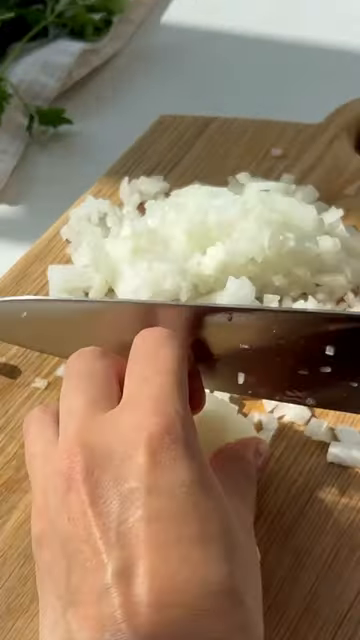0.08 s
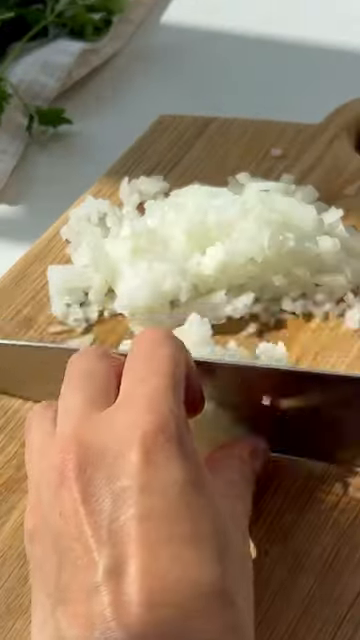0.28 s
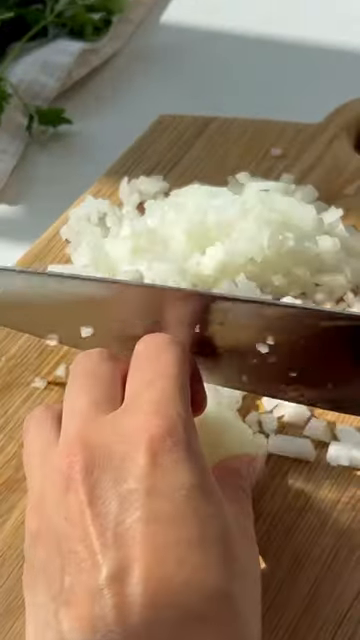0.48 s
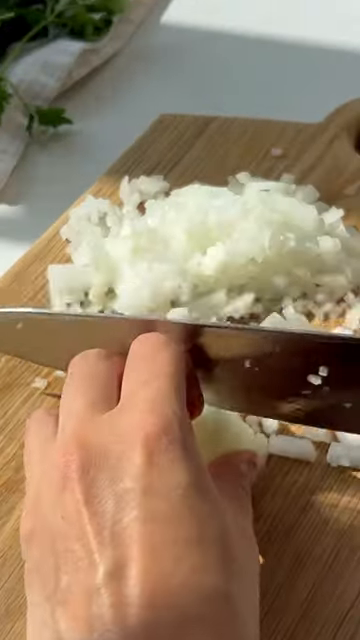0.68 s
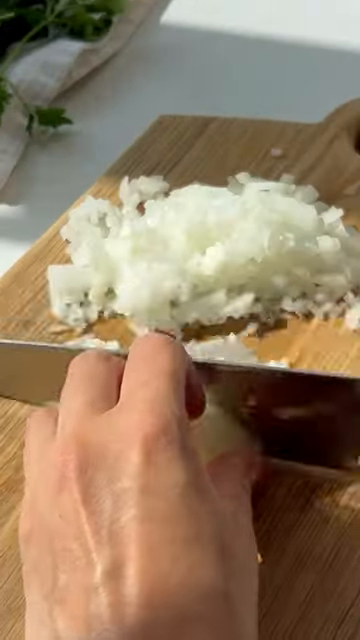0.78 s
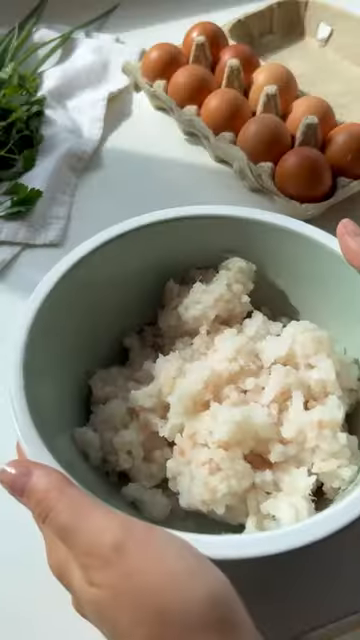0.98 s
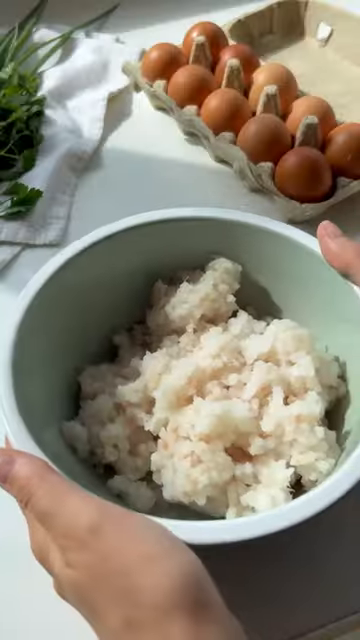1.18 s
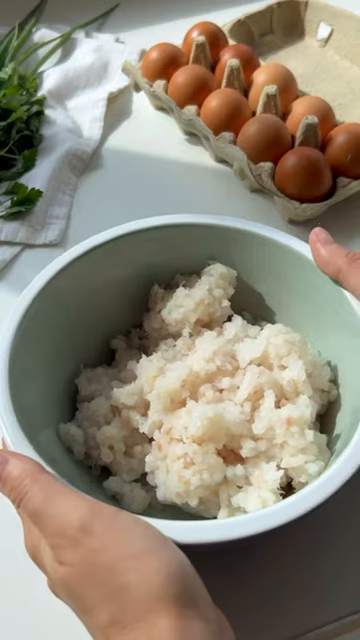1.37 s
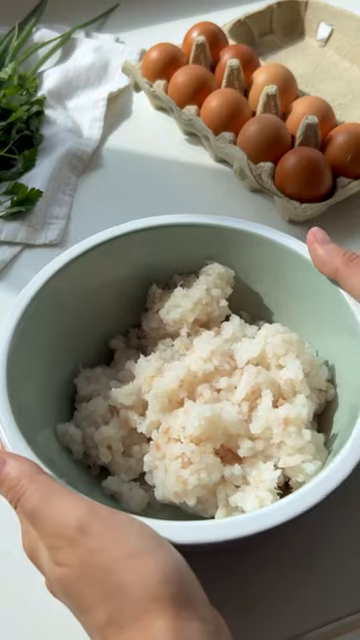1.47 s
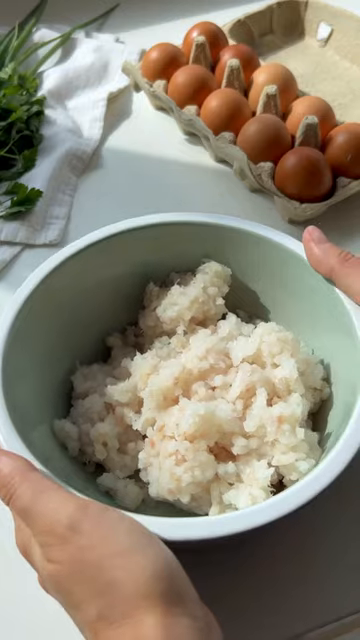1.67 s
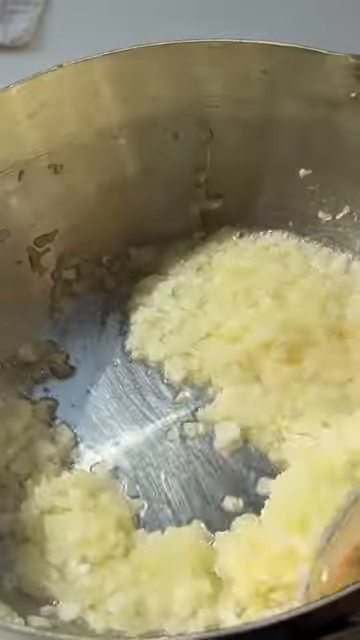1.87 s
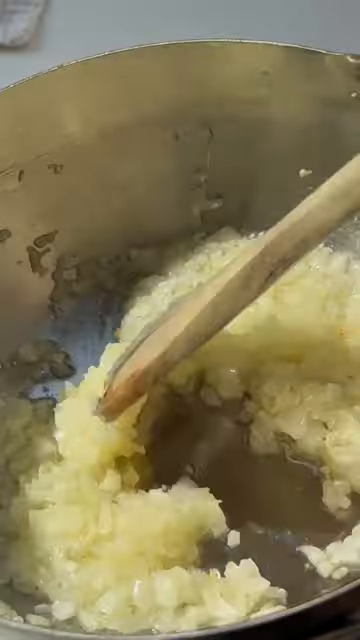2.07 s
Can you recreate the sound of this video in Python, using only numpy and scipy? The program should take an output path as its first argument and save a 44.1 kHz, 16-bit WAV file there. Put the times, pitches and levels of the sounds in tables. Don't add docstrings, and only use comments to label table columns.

```python
import sys
import numpy as np
from scipy import signal
from scipy.fft import rfft, irfft, next_fast_len
from scipy.io import wavfile

SR = 44100
rng = np.random.default_rng(int(sys.argv[2]) if len(sys.argv) > 2 else 0)


def ratio(d):
    e = np.asarray(d, float) / 20
    return 10 ** e


def master(y):
    cut = np.clip(np.atleast_2d(y).T, -1, 1)
    pcm = np.round(cut * 32767)
    wavfile.write(sys.argv[1], SR, pcm.astype(np.int16))


N = 94815
TIME = np.arange(N) / SR
SIZE = next_fast_len(2 * N)


def colour(x, points, causal=True):
    hz, db = np.array(points, float).T
    bin_hz = np.arange(SIZE // 2 + 1) * SR / SIZE
    gain_db = np.interp(np.log(bin_hz + 1), np.log(hz), db)
    cepstrum = irfft(gain_db * np.log(10) / 20, SIZE)
    if causal:
        cepstrum[1:SIZE // 2] *= 2
        cepstrum[SIZE // 2 + 1:] = 0
    return irfft(rfft(x, SIZE) * np.exp(rfft(cepstrum)), SIZE)[..., :N]


def level(x, db=0):
    return x * ratio(db) / np.sqrt(np.mean(x ** 2))


def ring(force, modes):
    t = TIME[:SR // 2]
    body = 0
    for k, (hz, db, t60) in enumerate(modes):
        decay = ratio(db - 60 * t / max(t60, .005))
        body = body + (-1) ** k * decay * np.sin(2 * np.pi * hz * t)
    return signal.fftconvolve(force, body / np.abs(body).max())[:N]


def blows(hits):
    force = np.zeros(N)
    for s, db, ms in hits:
        phase = np.clip((TIME - s) / (ms / 1000), 0, 1)
        force += ratio(db) * np.sin(np.pi * phase) ** 2 / (ms * SR / 2000)
    return force


def grains(rate, spread_db, channels=2):
    shape = (channels, N)
    struck = rng.random(shape) < rate / SR
    sizes = rng.standard_normal(shape)
    loudness = ratio(spread_db * np.minimum(rng.exponential(size=shape), 5))
    return level(struck * sizes * loudness)


def curve(points):
    s, db = np.array(points, float).T
    return ratio(np.interp(TIME, s, db))


# f/Hz, level/dB
ROOM_COLOUR = [(60, 0.5), (200, -1), (2000, -1), (2800, -1), (12000, -6)]


def room(x, wet_db):
    low_t60_s, halved_at_hz, first_wall_s = 0.79, 7100, 0.0054
    early_db, early_t60_s = 6, 0.11
    early = ratio(early_db - 60 * TIME / early_t60_s)
    tail = 0
    for hz in 62.5 * 2. ** np.arange(8):
        t60 = low_t60_s / (1 + hz / halved_at_hz)
        octave = signal.butter(2, [hz / 2 ** .5, hz * 2 ** .5], "band", fs=SR, output="sos")
        band = signal.sosfilt(octave, rng.standard_normal((2, N)))
        tail = tail + band * (ratio(-60 * TIME / t60) + early)
    tail = colour(tail * np.clip((TIME - first_wall_s) / 0.0018, 0, 1), ROOM_COLOUR)
    tail = tail / np.sqrt(np.sum(tail[0] ** 2))
    return ratio(wet_db) * signal.fftconvolve(x[None], tail, axes=1)[:, :N]


LEAN = [0, 0.31, 0.47, 0.25]


def placed(x, lean, wet_db):
    return np.array([x, lean * x]) + room(x, wet_db)


# f/Hz, level/dB
EARLY_FRYING = [(40, 5.5), (600, -18), (1200, -7), (2500, -15.5), (6000, -18.5), (8900, -9), (11400, -23),
                (12600, -73)]
# f/Hz, level/dB
FRYING = [(250, -41), (800, -4), (2100, -5), (10400, -3.5), (11900, -8.5), (12600, -61.5)]


def frying(spectrum, db, rate, spread_db):
    crackle = grains(rate, spread_db)
    hiss = 0.94 * rng.standard_normal((2, N))
    return level(colour(crackle + hiss, spectrum), db)


# f/Hz, level/dB
HUM = [(25, -16.5), (100, -3), (234, 1.5), (374, -17), (490, -12), (880, -28), (7600, -36.5), (12600, -59)]


def hum():
    return level(colour(rng.standard_normal((2, N)), HUM))


# t/s, length/s, level/dB, swell/dB
SLICES = [
    (0.089, .014, -61, 9),
    (0.1, 0.023, -47.5, 4),
    (.125, 0.056, -63, 17),
    (0.186, 0.082, -37.5, 10),
    (0.592, 0.0058, -45.5, -9.5),
    (0.604, 0.062, -69.5, -1.5),
    (0.66, 0.05, -47.5, 0.5),
    (0.696, 0.086, -39, 2),
]
# t/s, level/dB
SNAPS = [(0.113, -33), (0.124, -54.5), (.192, -32.5), (0.207, -35), (0.225, -38.5), (0.242, -41),
         (0.251, -31.5), (0.595, -40), (0.669, -41), (0.705, -35), (0.715, -30), (0.736, -33.5),
         (0.75, -29)]


def bursting():
    env = np.zeros(N)
    for s, length, db, swell_db in SLICES:
        u = (TIME - s) / length
        release_db = np.maximum(TIME - s - length, 0) * 60 / 0.0405
        onset = np.clip((TIME - s) / 0.0058, 0, 1)
        env += ratio(db + swell_db * (u - 0.5) - release_db) * onset * (u < 9)
    for s, db in SNAPS:
        env += ratio(db - 60 * np.abs(TIME - s - .001) / 0.0068) * (TIME > s)
    return env


# t/s, level/dB
PRESSURE = [(.09, -42), (.112, -47), (.134, -49), (.18, -56), (.224, -33), (.28, -26.5), (.312, -26.5),
            (.34, -29), (.46, -44), (.586, -46.5), (.612, -44), (.68, -53), (.745, -27), (.775, -34.5),
            (.81, -21), (.93, -39)]
# f/Hz, level/dB, t60/s
BOARD_LOW = [(95, -5.5, 0.051), (135.5, -3.5, 0.1), (181.6, -0.5, 0.15), (219, 2, 0.042), (256, -13, 0.056)]
# t/s, level/dB, contact/ms
SHOVES = [
    (.115, -38, 6.5),
    (.21, -33, 5.1),
    (.245, -40.5, 7.3),
    (.605, -30.5, 8),
    (.725, -25.5, 5.8),
    (.76, -36.5, 9),
]
# f/Hz, level/dB, t60/s
COUNTER = [(41.2, 5.6, 0.18), (78, 3.6, 0.087)]


def rocking():
    friction = level(ring(grains(2000, 0.74)[0], BOARD_LOW), -5.5)
    return curve(PRESSURE) * friction + ring(blows(SHOVES), COUNTER)


# t/s, level/dB, contact/ms
TOUCHES = [
    (.1125, -35, 0.23),
    (.1205, -28, .5),
    (.1915, -30.5, 0.18),
    (.7055, -33.5, 0.49),
    (.738, -33, .3),
    (.751, -34, 0.32),
]
# f/Hz, level/dB, t60/s
BLADE = [(143.5, -2, 0.3), (723, -4, 0.118), (1192, -5.5, 0.16), (1640, -1, .05), (2700, -9.5, 0.04)]


def touching():
    return ring(blows(TOUCHES), BLADE)


# t/s, level/dB, f/Hz, t60/s
SINGS = [(.1205, -33, 723, 0.13), (.199, -33, 1640, 0.044), (.209, -34, 1192, .25),
         (.2245, -25.5, 2700, 0.036), (.226, -31.5, 1710, 0.04), (.241, -28, 1192, 0.062),
         (.2525, -29, 1660, 0.041), (.597, -37.5, 812, 0.049), (.603, -36, 630, 0.052),
         (.714, -28, 1600, .04), (.749, -27.5, 1146, .06)]


def singing():
    song = 0
    for s, db, hz, t60 in SINGS:
        song = song + ring(blows([(s, db, .15)]), [(hz, 0, t60)])
    return song


# t/s, level/dB, contact/ms
CHOPS = [
    (.2682, -2, .4),
    (.7798, -3, .4),
]


def clack():
    lead_s, length_s, hz = .0006, .0034, 1075
    chops = np.array(CHOPS)
    u = TIME - chops[:, :1]
    gate = np.sin(np.pi * np.clip((u + lead_s) / length_s, 0, 1)) ** .5
    swings = ratio(chops[:, 1:2] - 7.5) * gate * np.sin(2 * np.pi * hz * (u - .00015))
    return np.sum(swings, axis=0)


# f/Hz, level/dB, t60/s
BOARD = [(372, -19.5, .1), (554, -14.5, .06), (686, -17, 0.14), (857, -32, 0.043), (1021, -20.5, 0.028),
         (1106, -21, 0.15), (1190, -4.5, 0.075), (1354, -16.5, 0.06), (1636, -2.5, 0.026),
         (1556, -17, 0.06), (1820, -27, 0.029), (2270, -14.5, 0.04), (2517, -1.5, 0.011), (3330, -4, 0.006)]


def board_knock():
    return ratio(-0.5) * ring(blows(CHOPS), BOARD)


# f/Hz, level/dB
CRACK = [(200, 0), (380, 1.5), (800, -0.5), (1700, 9), (2300, 0), (3000, -13), (7000, -44.5)]


def cracking():
    burst = ratio(-7 - 60 * TIME / 0.014) * rng.standard_normal(N)
    return colour(signal.fftconvolve(blows(CHOPS), burst)[:N], CRACK)


# t/s, level/dB, contact/ms
NUDGES = [
    (.5955, -20.5, 0.95),
    (.607, -42.5, 0.64),
]
# f/Hz, level/dB, t60/s
SPOON = [(560, 2, 0.0056), (823, 1.5, 0.022), (1537, 0.5, 0.029), (1990, -2, 0.026), (2720, 3, 0.0243)]
# f/Hz, level/dB
CRUNCH = [(200, -29.5), (320, -8), (1200, -11), (2700, -11.5), (3100, -16), (8900, -18), (11600, -22.5),
          (12600, -75.5)]
# f/Hz, level/dB
CENTRED = [(1500, -4), (1900, -19), (5200, -23), (6200, -1)]


def chopping():
    crack = cracking()
    cells, env = grains(8000, 3.0), bursting()
    crunch = env * level(colour(cells, CRUNCH))
    shaken = ring(env * cells[0], BLADE) * ratio(-20.5)
    nudged = ring(blows(NUDGES), SPOON)
    knock = touching() + singing() + clack() + board_knock() + nudged
    splinters = room(crack, 5.6)
    rock = rocking()
    mid, side = crunch + splinters + room(crunch[0], -5.3) + placed(knock + shaken, LEAN[1], -14.5)
    return np.array([mid + rock, colour(side, CENTRED, causal=False)])


# t/s, level/dB, contact/ms
BOWL_HITS = [
    (1.4022, -5.5, 1.09),
    (1.4065, -13, 1.9),
    (1.4285, -30, 0.5),
    (1.4395, -14.5, 1.32),
    (1.503, -35.5, 1.05),
    (1.523, -35, 0.82),
    (1.55, -45, 0.96),
]
# f/Hz, level/dB, t60/s
BOWL = [(114, -10.5, 0.045), (165, -6.5, 0.029), (264, -6, 0.097), (392, -6.5, 0.084), (438, -9, 0.067),
        (464, -7.5, 0.06), (546, -9.5, 0.056), (728, -7.5, 0.039), (1018, -9.5, 0.038), (1466, -7.5, 0.011),
        (2490, 3, 0.019)]
# f/Hz, level/dB
TICK = [(300, -3.5), (1000, 8), (2800, -6), (4000, -22), (7000, -31.5), (9000, -47)]


def bowl():
    late = TIME - 1.4035
    swell = ratio(-27 - 60 * np.maximum(late / 0.042, -late / 0.026))
    tick = swell * level(colour(grains(9000, 3.2)[0], TICK))
    return placed(ring(blows(BOWL_HITS), BOWL) + tick, LEAN[2], -9)


# t/s, level/dB
DRAG = [(1.84, -44), (1.86, -37), (1.93, -31.5), (1.975, -30.5), (2.03, -41), (2.08, -43), (2.15, -48)]
# f/Hz, level/dB, t60/s
PAN_LOW = [(186, -3.5, 0.086), (241.2, -3.5, 0.51), (322, -1.5, 0.027), (532, -17, 0.092),
           (875, -20, 0.027)]


def dragging():
    return curve(DRAG) * level(ring(grains(1500, 1.6)[0], PAN_LOW), -5.5) * (TIME > 1.84)


# t/s, level/dB, contact/ms
KNOCKS = [
    (1.8452, -7.5, 0.25),
    (1.8478, -21, 0.87),
    (1.8505, -20, 0.61),
]
# t/s, level/dB, contact/ms
TAPS = [
    (1.8456, -16, 0.11),
    (1.8502, -37.5, 0.42),
]
# f/Hz, level/dB, t60/s
PAN = [(543, -12, 0.51), (771, 1.5, 0.19), (1028, -8.5, 0.31), (1067, -2.5, 0.19), (1550, -2, 0.6),
       (5400, -6, .03), (1814, 3, 0.064), (2202, -3, 0.7), (2178, -11, .5), (2500, 10, 0.04),
       (2902, -3.5, 0.35), (2924, -11, 0.71), (3410, -8, 0.069), (4394, -6.5, 0.14)]
# t/s, level/dB, contact/ms
LURCHES = [
    (1.848, -42, 4.4),
    (1.9, -38.5, 3.1),
    (1.962, -39, 4.1),
    (1.985, -38, 7.6),
]
# f/Hz, level/dB, t60/s
HOB = [(70.3, -3, 0.25), (100, -0.5, .1)]
# t/s, level/dB, contact/ms
RELAND = [
    (1.9552, -21, 0.34),
    (1.9572, -21, 0.26),
]
# f/Hz, level/dB, t60/s
SPOON_EDGE = [(534, -5.5, 0.034), (826, 3, 0.037), (1356, -3, 0.029), (1950, -2, 0.0085)]


def stirring():
    low = dragging() + ring(blows(LURCHES), HOB) + ratio(-4) * ring(blows(RELAND), PAN_LOW)
    stilled_db = 252 * np.maximum(TIME - RELAND[0][0], 0)
    steel = ring(blows(TAPS), PAN) * ratio(-stilled_db)
    wood = ring(blows(KNOCKS), SPOON) + ring(blows(RELAND), SPOON_EDGE)
    taps = placed(steel, LEAN[3], -16.5) + placed(wood, LEAN[3], -13)
    return taps + low * [[1], [.3]] + frying(FRYING, -49, 6000, 2.2)


# f/Hz, level/dB
SIDE_GAIN = [(60, -28.5), (200, -28), (350, -11), (640, 0.5), (1150, 3), (2080, -8), (3750, -3),
             (8000, -2.5), (11000, -0.5), (12500, -1)]


def two_ports(mix):
    treble = colour(mix[0], [(6000, -40), (10500, -12.0), (12500, -1)])
    side = colour(mix[1], SIDE_GAIN, causal=False) + .8 * signal.hilbert(treble).imag
    return np.array([mix[0] - side, mix[0] + side])


# start t/s, end t/s, fade-in/s
SHOTS = [
    (-.01, 0.087, 0.0019),
    (0.083, .933, 0.0056),
    (0.935, 1.725, 0.0052),
    (1.721, 2.202, 0.026),
]
HUM_DB = [-48, -57.5, -51.5, -53]


def scene():
    sources = [frying(EARLY_FRYING, -48, 8200, 0.85), chopping(), bowl(), stirring()]
    background = hum()
    mix = 0
    for (start, end, fade), source, db in zip(SHOTS, sources, HUM_DB):
        gate = np.clip((TIME - start) / fade, 0, 1) * np.clip((end - TIME) / 0.0048, 0, 1)
        mix = mix + (source + ratio(db) * background) * gate
    return two_ports(mix)


def roll_off(x):
    return signal.sosfilt(signal.butter(12, 12840, fs=SR, output="sos"), x)


def record(dry):
    top_cut = signal.ellip(6, .3, 50, 12450, fs=SR, output="sos")
    bass_cut = signal.butter(4, 36., "high", fs=SR, output="sos")
    mix = signal.sosfilt(bass_cut, signal.sosfilt(top_cut, dry))
    return roll_off(mix)


dry = scene()
out = record(dry)
master(out)
```